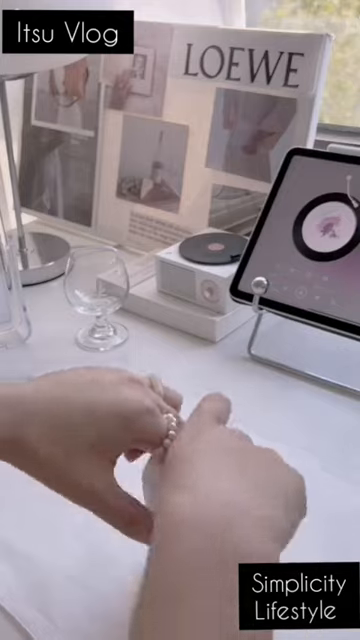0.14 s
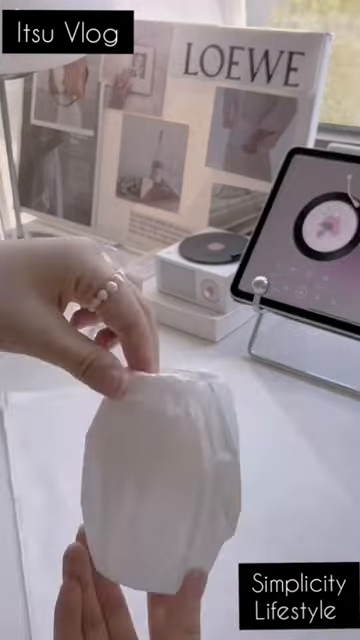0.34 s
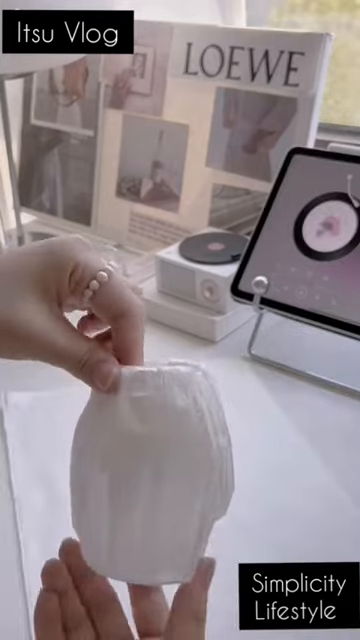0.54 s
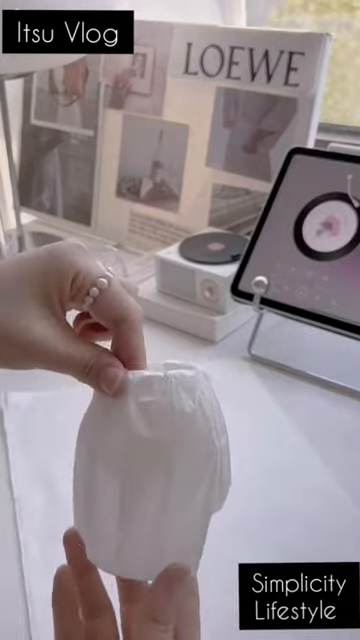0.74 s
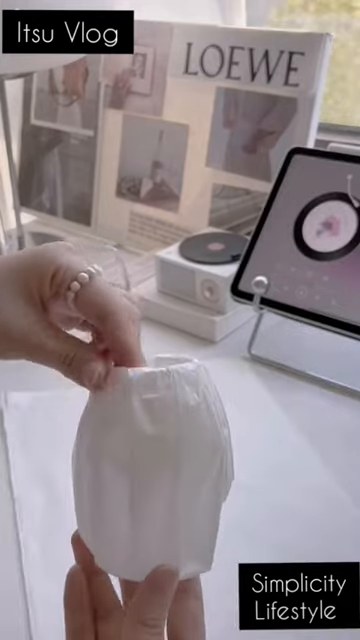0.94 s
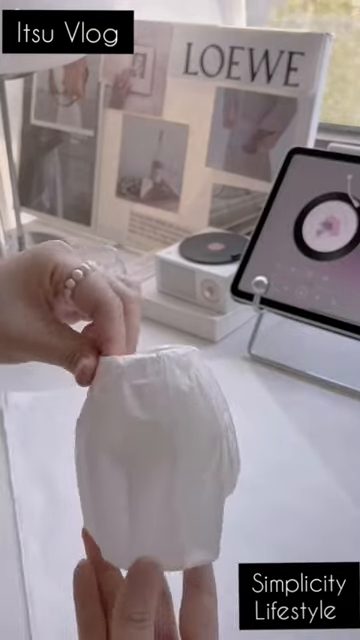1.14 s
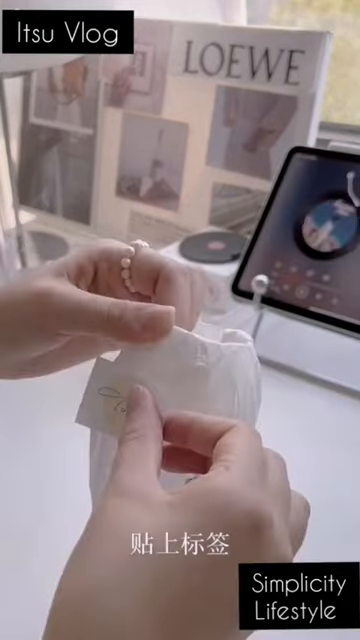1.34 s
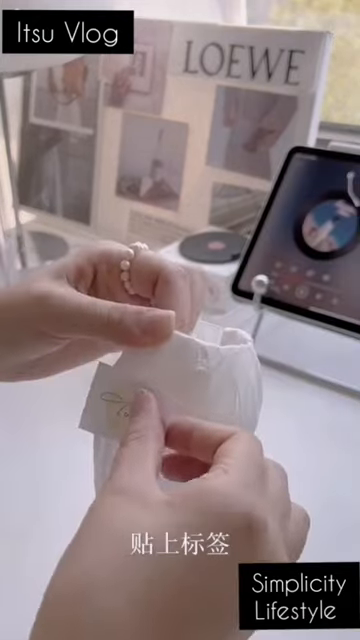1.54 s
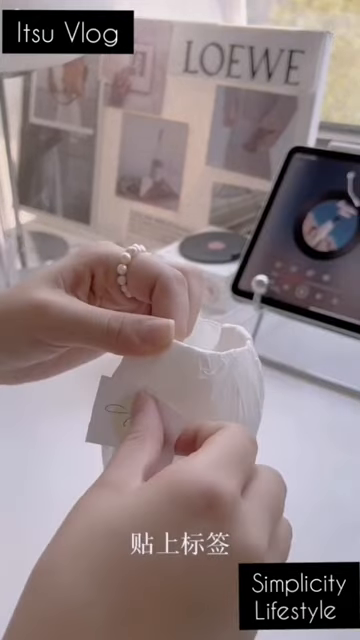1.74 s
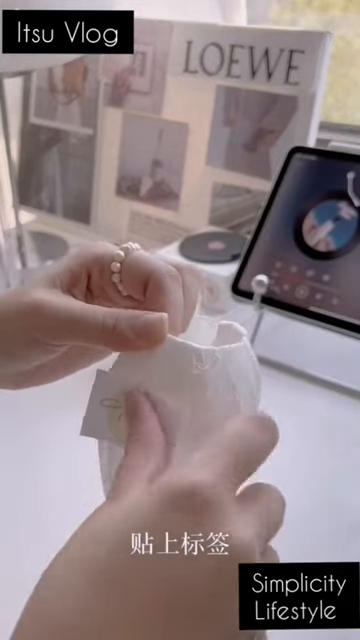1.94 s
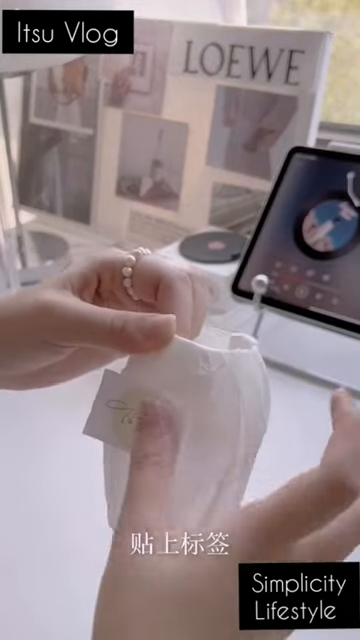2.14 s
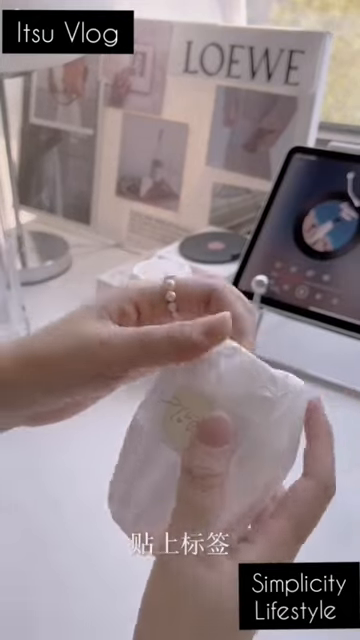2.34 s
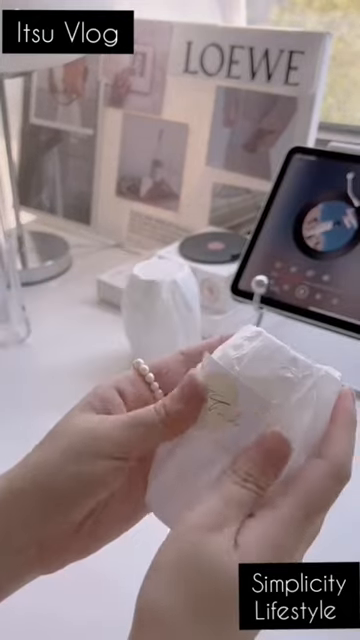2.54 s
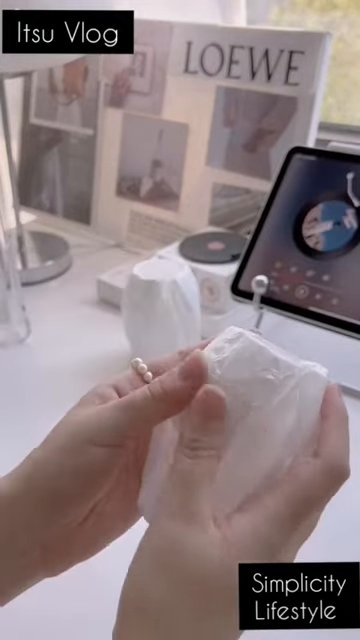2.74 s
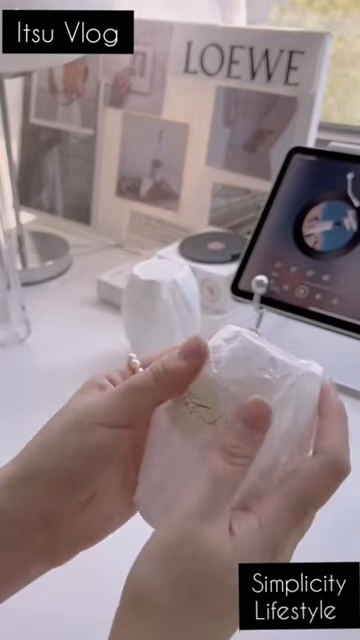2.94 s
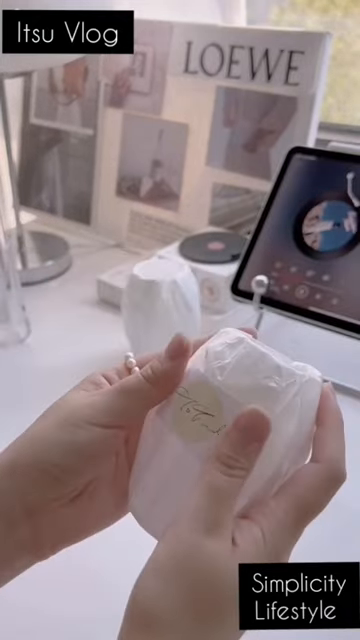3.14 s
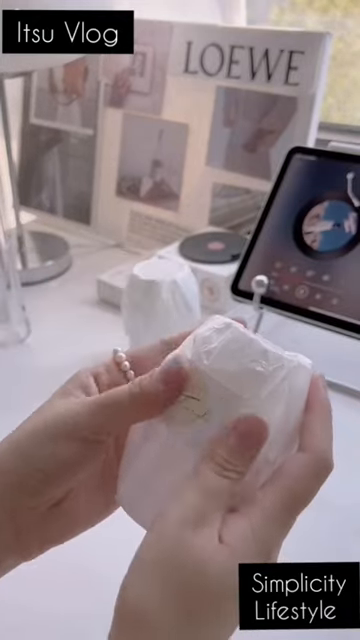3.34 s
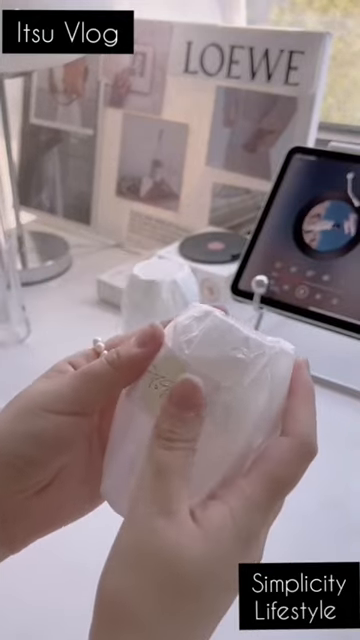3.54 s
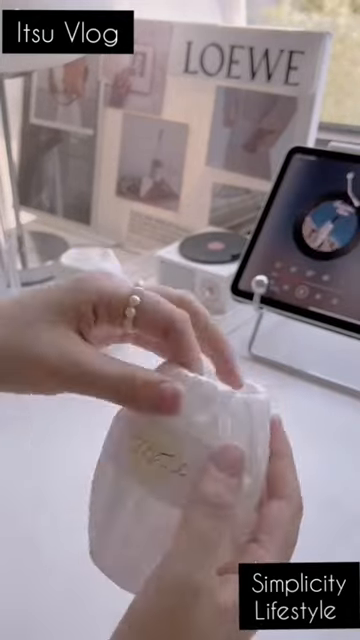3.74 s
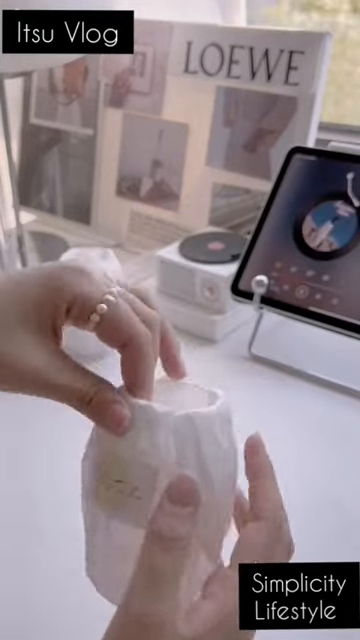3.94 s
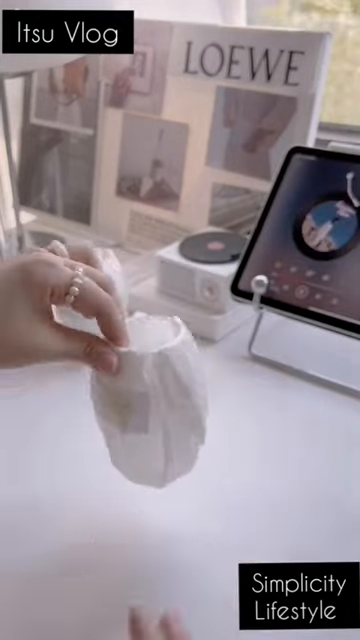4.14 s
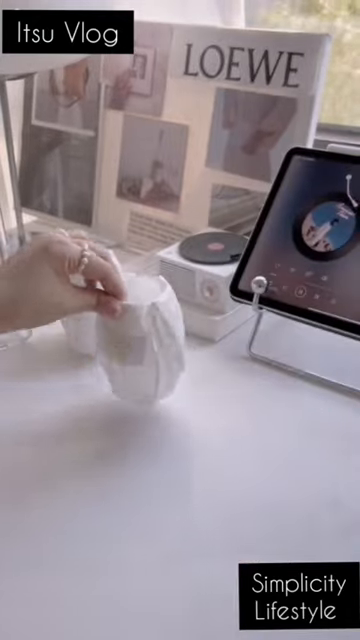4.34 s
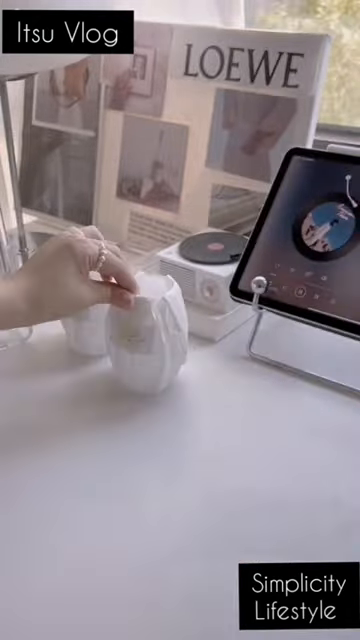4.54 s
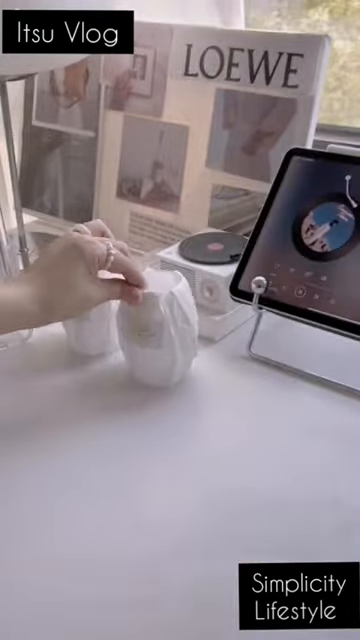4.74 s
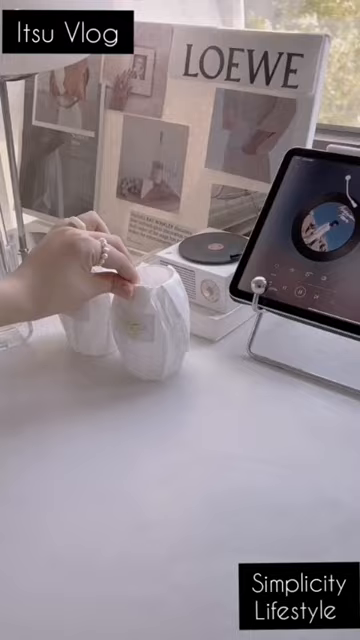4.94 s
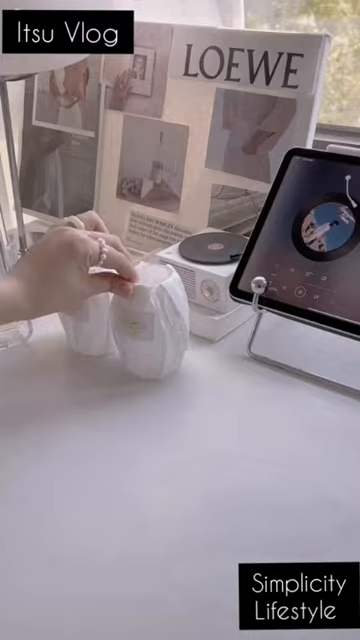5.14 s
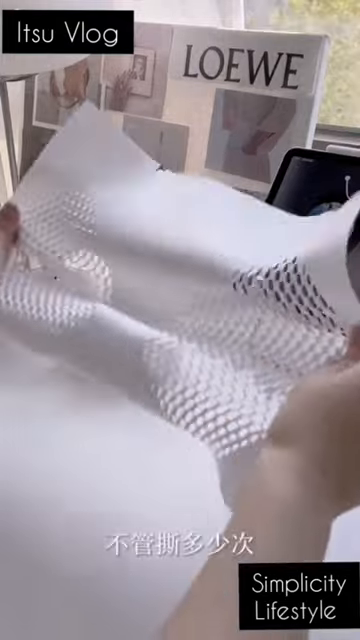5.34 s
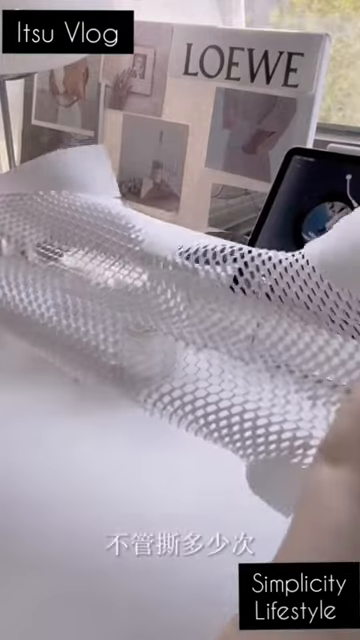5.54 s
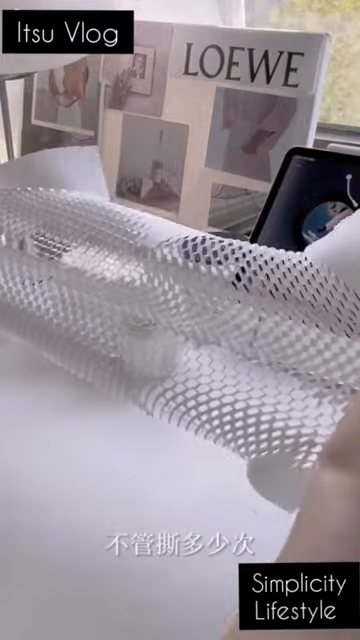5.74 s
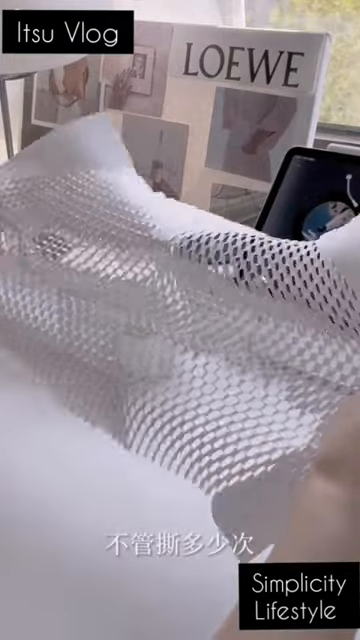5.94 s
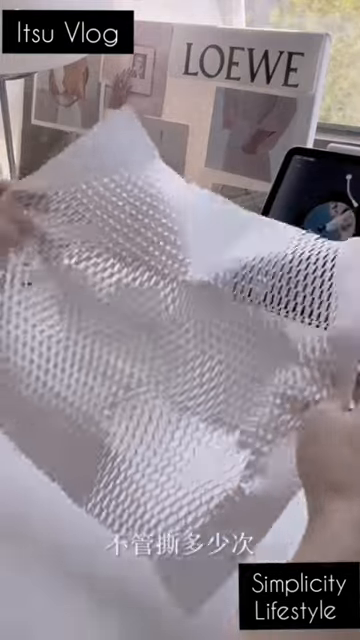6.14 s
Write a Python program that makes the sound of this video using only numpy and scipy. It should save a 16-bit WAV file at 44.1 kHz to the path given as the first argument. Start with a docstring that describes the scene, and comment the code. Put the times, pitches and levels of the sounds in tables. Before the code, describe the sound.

Thin paper crinkles and snaps around a glass, quieter handling follows, a dull knock on the desk, then honeycomb paper rips open in a crackling rush.

```python
"""Thin paper rustles and its folds snap as hands wrap a glass, press on a label and tuck in the ends.
The wrapped glass is set down on a desk with a dull knock, then a sheet of slit honeycomb paper is pulled open.
Paper is many tiny random slips, shaped by tone and loudness curves; knocks are fading tones and a dull boom.
Close stereo sound, in a slightly ringing room with a faint low rumble and a faint hiss."""
import sys
import numpy as np
from scipy import signal
from scipy.fft import rfft, irfft
from scipy.io import wavfile

SR = 44100
rng = np.random.default_rng(int(sys.argv[2]) if len(sys.argv) > 2 else 0)


def waveform_to_disk(signal):
    """Save audio, clipped to [-1, 1], as 16-bit WAV at the path in sys.argv[1]."""
    frames = np.transpose(np.atleast_2d(signal))
    scaled = np.clip(frames, -1, 1) * 32767
    samples = np.round(scaled).astype(np.int16)
    wavfile.write(sys.argv[1], SR, samples)


N = 272538
TIME = np.arange(N) / SR

# ringing tones of the desk top: (pitch [Hz], relative level [dB], time to fade by 60 dB [s])
DESK_MODES = [(121, -23, 1.25), (176.49, -22.5, 0.73), (232.31, -26, 0.67), (288.51, -27, 0.22),
              (366, -11.5, 0.043), (392.55, -21.5, .3), (511.08, -30.5, .3), (724.25, -13, 0.088),
              (778, -15.5, 0.034), (1199.8, -7.5, 0.017)]
# tone of crinkling paper: (frequency [Hz], relative level [dB per Hz])
CRINKLE_TONE = [(300, -29), (800, -7), (1200, -3.5), (1900, 0.5), (2400, 1), (3300, 1), (4900, -0.5),
                (5900, 0), (10500, -6.5), (12500, -2.5), (15500, -9)]
# tone of rubbing fingers and a fluttering sheet: (frequency [Hz], relative level [dB per Hz])
RUB_TONE = [(90, -12), (220, 0.5), (370, -1), (520, -1), (740, -2.5), (1050, -4), (1600, -2.5), (4000, -30)]
# tone of tearing slits and of skin hissing over paper: (frequency [Hz], relative level [dB per Hz])
TEAR_TONE = [(3000, -43), (6000, -14), (7500, -3), (10300, -2.5), (12200, 2), (14000, 4.5), (15500, -4.5)]

FIRM_GRIP_DB = -48   # crinkle level at which a grip counts as firm


def from_db(db):
    """Turns decibels into a plain multiplier."""
    return 10 ** (np.asarray(db) / 20)


def rms_one(x):
    """Scales a signal to an average strength (rms) of 1."""
    return x / np.sqrt(np.mean(x ** 2) + 1e-20)


def gains(rows, before_db=None):
    """Turns each dB column of a curve into a gain at every sample."""
    times, *columns = np.transpose(rows)
    return [from_db(np.interp(TIME, times, column, left=before_db)) for column in columns]


def at_hz(points, hz):
    """Reads a curve at any frequency, with straight lines over log frequency."""
    table = np.array(points)
    return np.interp(np.log(hz + 1e-9), np.log(table[:, 0]), table[:, 1])


def convolve(x, impulse):
    """Lets every sample set off the given response, and keeps the length of the signal."""
    x, impulse = np.atleast_2d(x, impulse)
    return signal.oaconvolve(x, impulse, axes=-1)[:, :x.shape[-1]]


def response(spectrum, size=8192):
    """Makes an impulse response with the given spectrum that starts at once (minimum phase)."""
    level_db = at_hz(spectrum, np.fft.rfftfreq(size, 1 / SR))
    cepstrum = irfft(np.log(from_db(level_db)))
    # folding the second half onto the first leaves nothing ahead of time zero
    cepstrum[1:size // 2] *= 2
    cepstrum[size // 2 + 1:] = 0
    return irfft(np.exp(rfft(cepstrum)))


def colour(x, spectrum):
    """Gives white noise a tone and keeps its power."""
    impulse = response(spectrum)
    return convolve(x, impulse / np.linalg.norm(impulse))


def add(out, s, sound):
    """Mixes a sound into the output from time s, cut off at the end."""
    start = max(0, round(s * SR))
    out[..., start:start + sound.shape[-1]] += sound[..., :max(0, N - start)]


def ring(hz, t60, t):
    """A pure tone that fades by 60 dB in t60 seconds."""
    return np.sin(2 * np.pi * hz * t) * from_db(-60 * t / t60)


def wander(per_s):
    """A random line of spread about 1 that takes per_s new values each second."""
    values = np.clip(rng.standard_normal(4096), -2, 2)
    return np.interp(TIME * per_s, np.arange(4096), values)


def grains(per_s, spread_db, clump_db, clump_hz, hiss):
    """Fibres slip at random, in clumps, over a smooth sliding hiss; white, rms 1; middle and side."""
    born = np.flatnonzero(rng.random(N) < per_s / SR)
    sizes = from_db(spread_db * np.minimum(rng.exponential(1, len(born)), 4))
    slips = np.zeros((2, N))
    slips[:, born] = sizes * np.sign(rng.random((2, len(born))) - .5)
    clumps = from_db(clump_db * wander(clump_hz))
    smooth = hiss * rng.standard_normal((2, N))
    return rms_one(clumps * (rms_one(slips) + smooth))


def strokes(rows, attack_s, sag_db_per_s, slows_per_db=0):
    """Each stroke swells (a light one can swell more slowly), sags and fades; one gain curve per dB column."""
    coarse, power = TIME[::32], 0
    for s, held_s, fade_s, *levels_db in rows:
        t = np.maximum(coarse - s, 0)
        lighter_db = max(FIRM_GRIP_DB - levels_db[0], 0)
        swell = np.minimum(t / (attack_s * np.exp(slows_per_db * lighter_db)), 1)
        sag_db = sag_db_per_s * (t - held_s / 2)   # zero halfway through the hold
        fade_db = 20 * np.maximum(t - held_s, 0) / fade_s
        shape = swell * from_db(-sag_db - fade_db)
        power = power + np.outer(from_db(levels_db), shape) ** 2
    return [np.interp(TIME, coarse, np.sqrt(p + 1e-18)) for p in power]


def room_tail(swell_s, size=SR):
    """Diffuse echoes that build up and die away band by band; middle and side."""
    # how long the room rings: (frequency [Hz], time to fade by 60 dB [s])
    room_t60 = [(120, 0.71), (300, 0.8019), (800, 0.41034), (2500, 0.25), (7000, 0.23), (15000, 0.14)]
    t, tail = TIME[:size], 0
    edges = np.geomspace(60, 19000, 13)
    for low, high in zip(edges, edges[1:]):
        band_filter = signal.butter(2, [low, high], "band", fs=SR, output="sos")
        band = signal.sosfilt(band_filter, rng.standard_normal((2, size)))
        t60 = at_hz(room_t60, np.sqrt(low * high))
        tail = tail + band * from_db(-60 * t / t60)
    return tail * (1 - np.exp(-t / swell_s))


def room(x, wet_db, thin_hz=700):
    """Small paper surfaces throw little bass into the room, so its echoes are thinned below thin_hz."""
    tail = signal.lfilter(*signal.butter(1, thin_hz, "high", fs=SR), room_tail(swell_s=0.0013))
    return from_db(wet_db) * convolve(x[0], tail / np.linalg.norm(tail[0]))


def glances(x, strength, per_s, near_s=.0002, far_s=.003, count=4):
    """Treble glances off the moving hands and paper: short echoes that come and go and shift its colour."""
    treble = signal.lfilter(*signal.butter(1, 1000, "high", fs=SR), x)
    out, power = x.copy(), 1
    for lag_s in np.geomspace(near_s, far_s, count) * rng.uniform(.8, 1.25, count):
        share = strength * wander(per_s)
        out += share * np.roll(treble, int(lag_s * SR), axis=-1)
        power = power + share ** 2
    return out / np.sqrt(power)   # evens out the loudness


def room_rumble():
    """Low noise of the room, with a slowly changing level."""
    # loudness of the rumble: (time [s], level [dB])
    rumble_level = [(0, -66.5), (1.5, -58), (2.3, -54), (3.6, -58.5), (3.9, -67.5), (4.5, -64.5),
                    (5.35, -62), (5.7, -74)]
    # tone of the rumble: (frequency [Hz], relative level [dB per Hz])
    rumble_tone = [(20, -22), (38, -12), (51, 0), (68, -8), (95, -16), (125, -13), (170, -19), (280, -27),
                   (450, -46), (1500, -55), (13000, -60)]
    return gains(rumble_level)[0] * colour(rng.standard_normal((2, N)), rumble_tone)


def desk_drone():
    """The arms lean on the desk and its three lowest modes drone: noise through narrow filters."""
    # the arms lean: (time [s], held for [s], added fade takes 20 dB in [s], level at mid-hold [dB])
    leans = [(0.52, .77, .08, -55), (3.72, 0.4218, 0.1374, -58.5), (4.17, 0.3021, .2, -54)]
    drone_q, step_db = 6, -5   # sharpness of each mode; each higher mode is this much weaker
    white = rng.standard_normal((2, N))
    drone = 0
    for k, (hz, _, _) in enumerate(DESK_MODES[:3]):
        mode = signal.iirpeak(hz, drone_q, fs=SR)
        tone = signal.lfilter(*mode, signal.lfilter(*mode, white))
        drone = drone + from_db(step_db * k) * rms_one(tone)
    return strokes(leans, attack_s=.05, sag_db_per_s=2.5)[0] * rms_one(drone)


def desk_rubs():
    """The glass, hands and sheet rub on the desk: low noise in strokes."""
    # the rubs: (time [s], held for [s], added fade takes 20 dB in [s], level at mid-hold [dB])
    desk_strokes = [(-0.02, .19, 0.0614, -45), (0.18, .068, 0.0087, -30.5), (0.55, .74, 0.0009, -61),
                    (5.28, 0.1649, 0.2329, -52.5)]
    # tone of the rubbing: (frequency [Hz], relative level [dB per Hz])
    desk_tone = [(35, -24), (75, -7), (110, 3.5), (160, -12), (230, -13), (420, -7), (700, -30.5),
                 (3000, -76.5)]
    rubbing = strokes(desk_strokes, attack_s=0.023, sag_db_per_s=3.5)[0]
    return rubbing * colour(rng.standard_normal((2, N)), desk_tone)


def knocks_and_faint_tones():
    """A knock or faint tone: a tick and a fading tone, the modes of the desk top and a dull boom round the room."""
    # soft blows on glass and desk, and three faint tones near 750 Hz, like a finger squeak or the hollow
    # glass ringing: (time [s], relative level [dB], pitch [Hz], time to fade by 60 dB [s],
    # desk against the tone [dB])
    tone_rows = [(0.171, -16.5, 359.6, 0.012555, -25.5), (1.624, -55.5, 731.8, .1, -40.5),
                 (1.881, -51, 754.7, 0.04818, -42.5), (2.053, -28, 277.7, 0.05291, -9),
                 (2.195, -62, 754, 0.18, -38.5), (4.6191, -15, 600, 0.01495, 5.5)]
    # tone of the boom: (frequency [Hz], relative level [dB per Hz])
    boom_tone = [(70, -34.5), (120, -11), (220, -6), (400, -10.5), (550, -5), (800, -7.5), (1300, -12.5),
                 (1550, -22.5), (2300, -27), (3500, -40), (5000, -64)]
    boom_db, tick_db = -18.5, -32   # boom against the desk share; tick against the level of its row
    t = TIME[:2 * SR]
    desk = 0
    for k, (hz, db, t60) in enumerate(DESK_MODES):
        desk = desk + from_db(db) * ring(hz, t60, t) * (-1) ** k   # every other mode starts downwards
    boom = from_db(boom_db) * colour(room_tail(swell_s=.005), boom_tone)
    tick_noise = rng.standard_normal((2, SR)) * np.exp(-t[:SR] / .002)
    tick = from_db(tick_db) * colour(tick_noise, CRINKLE_TONE)
    direct, diffuse = np.zeros((2, 2, N))
    for s, db, hz, t60, desk_db in tone_rows:
        tone = ring(hz, t60, t)
        add(direct[0], s, from_db(db) * (tone + from_db(desk_db) * desk))   # middle only
        add(diffuse, s, from_db(db) * (tick + from_db(desk_db) * boom))
    soften = signal.butter(2, [85, 1800], "band", fs=SR, output="sos")
    return signal.sosfilt(soften, direct) + diffuse


def folds(rows, fall_s, flap_q, uneven_db, push_db, flap_db, crack_db, rise_s=.0009):
    """A fold gives way in a short avalanche of slips that cracks, rings the flap beside it and pushes the sheet."""
    # tone of the pushed sheet: (frequency [Hz], relative level [dB per Hz])
    push_tone = [(80, -20), (250, -11.5), (380, -2), (520, -4), (750, 1.5), (1100, 0), (2000, -26.5),
                 (6000, -82.5)]
    # tone of the crack: (frequency [Hz], relative level [dB per Hz])
    crack_tone = [(1500, -30.5), (3500, -3), (4200, 0.5), (4900, -4), (5900, 0.5), (10500, -2.5),
                  (12500, 0), (15500, -5.5)]
    build_s, loudness_s = .0023, 0.004118   # first slip to snap; time over which a burst's energy counts
    middle_hz, big_flap_slows = 2398, .4   # a lower flap gives way more slowly: power of its period
    t = np.arange(-256, 768) / SR   # the snap is at zero
    push, flap, crack = np.zeros((3, 2, N))
    sheet_band = signal.butter(2, 1300, fs=SR)
    flap_band = signal.butter(1, [900, 5000], "band", fs=SR)
    for s, level_db, low_db, high_db, hz in rows:
        speed = (hz / middle_hz) ** big_flap_slows
        avalanche = np.exp(np.minimum(t / rise_s, -t / fall_s) * speed)
        steps = np.repeat(rng.standard_normal(len(t) // 8), 8)   # a new slip size every 8 samples
        sizes = from_db(uneven_db * np.clip(steps, -2, 2))
        slips = rng.standard_normal((3, 2, len(t))) * avalanche * sizes   # three parts, middle and side
        dull = signal.lfilter(*sheet_band, slips[0])
        rung = signal.lfilter(*signal.iirpeak(hz, flap_q, fs=SR), slips[1])
        rung = signal.lfilter(*flap_band, rung)
        for out, burst, db in ((push, dull, low_db), (flap, rung, 0), (crack, slips[2], high_db)):
            energy = np.sum(burst ** 2, axis=1, keepdims=True)
            even = burst / np.sqrt(energy / (loudness_s * SR))
            add(out, s + build_s + t[0], from_db(level_db + db) * even)
    pushed = from_db(push_db) * convolve(push, response(push_tone))
    return pushed + from_db(flap_db) * flap + from_db(crack_db) * colour(crack, crack_tone)


def creases(level, from_s, until_s, count):
    """Lesser creases snap at loose intervals while paper is worked, louder when it is worked harder."""
    follows, spread_db = .7, 5.5   # dB per dB of working level; chance adds up to this much either way
    low_hz, high_hz = 1277.2, 3800   # range of flap pitches
    when, size, pitch = rng.random((count, 3)).T
    times = from_s + (np.arange(count) + when) / count * (until_s - from_s)
    working_db = 20 * np.log10(np.interp(times, TIME, level))
    levels_db = FIRM_GRIP_DB + follows * (working_db - FIRM_GRIP_DB) + spread_db * (2 * size - 1)
    flaps_hz = low_hz * (high_hz / low_hz) ** pitch
    rows = [(s, db, 0, 0, hz) for s, db, hz in zip(times, levels_db, flaps_hz)]
    return folds(rows, fall_s=.0013, flap_q=7.0, uneven_db=4.0, push_db=-9, flap_db=1, crack_db=-3.5)


def honeycomb():
    """Thousands of slits open: their ends tear, the cells pop up and the whole sheet flutters."""
    # the sheet is pulled open:
    # (time [s], relative flutter level [dB], relative popping level [dB], relative tearing level [dB])
    mesh = [(5.215, -68, -68.5, -71), (5.223, -64, -66.5, -68.5), (5.233, -47.5, -43, -48.5),
            (5.247, -41.5, -35, -40), (5.295, -44.5, -37, -40.5), (5.305, -37.5, -28.5, -35),
            (5.393, -42, -26.5, -27), (5.439, -40, -29.5, -34), (5.453, -44, -34, -31),
            (5.643, -61.5, -42, -38.5), (5.781, -63.5, -41, -38.5), (5.831, -69.5, -58, -57.5),
            (6.111, -64.5, -50.5, -52.5), (6.121, -63, -54, -42), (6.18, -61.5, -57.5, -55.5)]
    # tone of the popping cells: (frequency [Hz], relative level [dB per Hz])
    pop_tone = [(500, -39.5), (1200, -10), (1900, -3), (2700, -1), (3900, 1), (5000, -5.5), (6200, -5.5),
                (9000, -14.5)]
    flutter, pop, tear = gains(mesh, before_db=-120)
    sheet_grains = grains(1500, spread_db=2.0, clump_db=3.0, clump_hz=149.2, hiss=.3)
    cell_grains = grains(1800, spread_db=2.8, clump_db=2.6, clump_hz=300, hiss=.45)
    slit_grains = grains(6000, spread_db=1.5, clump_db=1.5, clump_hz=412.52, hiss=0.52)
    sheet = from_db(3.5) * colour(flutter * sheet_grains, RUB_TONE)
    cells = from_db(0.1832) * colour(pop * cell_grains, pop_tone)
    slits = from_db(0.8438) * colour(tear * slit_grains, TEAR_TONE)
    buckles = creases(pop, from_s=5.24, until_s=6.17, count=28)
    return sheet + cells + slits + buckles


def wrapper():
    """Small wrinkles crinkle, with a sharp tick now and then, while the fingers slide over the paper."""
    # the fingers take hold of the wrapper and squeeze: (time [s], held for [s], added fade takes 20 dB in [s],
    # relative crinkle level at mid-hold [dB], relative finger rub level at mid-hold [dB])
    grips = [(-0.02, 0.08962, 0.1329, -24.5, -30), (0.075, 0.16452, 0.0452, -30, -31),
             (0.25, 0.13723, 0.2579, -40.5, -43.5), (0.398, 0.02705, 0.0894, -33, -44.5),
             (0.462, 0.07647, 0.1272, -31.5, -47), (0.58, 0.11896, 0.1289, -33.5, -44),
             (0.73, 0.19563, 0.1422, -46, -52), (0.805, 0.03227, 0.1063, -33.5, -51),
             (0.928, 0.15017, 0.146, -32.5, -48.5), (1.09, 0.09894, 0.1187, -36.5, -55),
             (1.2, 0.09106, 0.0425, -43, -47), (1.585, 0.2215, 0.3051, -65.5, -67),
             (1.77, 0.2706, 0.0339, -58.5, -67.5), (1.942, 0.10595, 0.086, -44.5, -45),
             (2.11, 0.21, 0.0751, -69.5, -62), (2.268, 0.15753, 0.0656, -48.5, -51),
             (2.466, 0.07452, 0.1561, -44, -46.5), (2.602, 0.0609, 0.1561, -44, -42),
             (2.68, 0.11917, 0.1249, -48.5, -49.5), (2.85, 0.07363, 0.1606, -50, -54),
             (2.93, 0.07389, 0.1193, -43.5, -54), (3.07, 0.2394, 0.0149, -55.5, -64),
             (3.285, 0.11914, 0.1168, -47, -49), (3.48, 0.23, 0.1572, -56.5, -57),
             (3.645, 0.0956, 0.0989, -47, -53.5), (3.78, 0.1128, 0.1326, -58.5, -58),
             (3.885, 0.15393, 0.1543, -54, -53), (4.06, 0.093, 0.2829, -69.5, -63.5),
             (4.32, .2, 0.1987, -67.5, -76), (4.625, 0.13543, 0.0673, -63.5, -73),
             (4.81, 0.21439, 0.1873, -63, -57)]
    # a lighter grip swells more slowly: its attack grows by exp(slows_per_db) for each dB below firm
    crinkle, rub = strokes(grips, attack_s=0.021482, sag_db_per_s=14, slows_per_db=0.1245)
    ticks = .3 * grains(90, spread_db=2.5, clump_db=0, clump_hz=1, hiss=0)
    tiny = grains(2500, spread_db=1.0, clump_db=3.2, clump_hz=200, hiss=0.7)
    wrinkles = from_db(0.5) * colour(crinkle * (ticks + tiny), CRINKLE_TONE)
    sliding = rub * grains(900, spread_db=0.5, clump_db=5.0, clump_hz=121.78, hiss=1.0)
    finger_rub = from_db(-2.5) * colour(sliding, RUB_TONE)
    skin_hiss = from_db(-10) * colour(sliding, TEAR_TONE)
    snaps = creases(crinkle, from_s=0, until_s=4.1, count=130)
    return wrinkles + finger_rub + skin_hiss + snaps


def clear_folds():
    """The clearest folds of the paper snap through, each at its own time and flap pitch."""
    # the folds: (time [s], relative level [dB], push of the sheet against that level [dB],
    # crack against that level [dB], flap pitch [Hz])
    fold_rows = [(0.036, -7, -23.5, -14.5, 1944), (0.066, -2, -24.5, -20.5, 3162),
                 (0.093, -11, -20.5, -15.5, 3254), (0.108, -10.5, -16, -18.5, 1959),
                 (0.147, -9.5, -21, -17, 3944), (0.214, -9.5, -22.5, -7, 2095),
                 (0.414, -11, -28.5, -11.5, 3795), (0.465, -13.5, -44.5, -8, 2168),
                 (0.481, -12.5, -29, -12, 3316), (0.516, -2.5, -30.5, -14.5, 3678),
                 (0.541, -11.5, -24.5, -12, 2703), (0.651, -14, -32, -14, 4384),
                 (0.679, -11, -31.5, -15.5, 2582), (0.839, -19, -36, -19.5, 2840),
                 (0.928, -17, -32, -8, 3491), (0.941, -11, -33, -9, 2882), (1.068, -16, -25.5, -6, 3047),
                 (1.099, -13, -26.5, -13, 3760), (1.144, -20, -22, -2, 3460), (1.2, -6, -35.5, -18.5, 2452),
                 (1.246, -14, -27.5, -15, 3230), (1.591, -37, -30.5, -12, 1780),
                 (1.759, -37, -16.5, -15, 2420), (1.805, -25, -22.5, -14.5, 1410),
                 (1.95, -17, -20.5, -13.5, 1859), (2.045, -19, -21, -14, 1919),
                 (2.281, -22.5, -22.5, -10.5, 3841), (2.348, -23.5, -25, -32.5, 2543),
                 (2.413, -20, -23, -20, 1017), (2.429, -24.5, -18, -18, 1480),
                 (2.472, -9.5, -19, -15, 1662), (2.511, -23.5, -12.5, -16, 3623),
                 (2.618, -11.5, -20.5, -12.5, 1687), (2.635, -16.5, -31, -12.5, 1589),
                 (2.7, -21.5, -31.5, -21.5, 3474), (2.711, -18.5, -30.5, -19.5, 3462),
                 (2.773, -25, -29.5, -10.5, 1873), (2.856, -25, -19.5, -34.5, 1780),
                 (2.94, -23.5, -43.5, -7, 3913), (3.019, -28.5, -29, -21.5, 4223),
                 (3.076, -34, -22, -13, 2430), (3.145, -28.5, -25.5, -6.5, 4507),
                 (3.227, -28, -31.5, -14.5, 1655), (3.261, -27, -21, -16, 1734),
                 (3.302, -24.5, -15, -9, 1101), (3.366, -19.5, -28.5, -13.5, 1390),
                 (3.388, -14.5, -37, -20, 3208), (3.477, -17, -20, -19, 1713),
                 (3.504, -20.5, -21, -21.5, 1139), (3.565, -10, -34, -18.5, 3431),
                 (3.6, -29, -18.5, -18, 1250), (3.651, -20.5, -25, -18.5, 1763),
                 (3.683, -21, -21.5, -16, 1460), (3.733, -25.5, -29, -16.5, 3499),
                 (3.819, -24.5, -27, -17.5, 1639), (3.891, -22, -33, -18.5, 2894),
                 (3.961, -24.5, -38.5, -11, 4480), (4.017, -27, -19.5, -10, 1910),
                 (4.03, -29.5, -15.5, -13.5, 1000), (4.135, -27.5, -19.5, -26.5, 2037),
                 (4.429, -45.5, -16, -14, 4400), (5.233, -23, -20.5, -21, 2628),
                 (5.873, -27.5, -29.5, -15.5, 3960), (6.126, -35.5, -22, -5.5, 1881)]
    return folds(fold_rows, fall_s=0.0018989, flap_q=4.0, uneven_db=3.5,
                 push_db=4.0, flap_db=-16.5, crack_db=-1.0)


def scene():
    """Paper, glass and desk in the room, spread between left and right."""
    # the level of the paper sounds and echoes drops abruptly, then returns: (time [s], level [dB])
    level_drop = [(1.303, 0), (1.335, -20), (1.55, -20), (1.585, 0)]
    # side against middle: (frequency [Hz], level [dB])
    width = [(100, -26), (320, -8.5), (780, -1.5), (1150, -6.5), (1900, -24), (2700, -2), (3800, -8),
             (5000, 1), (6500, -16), (9000, -1.5), (11000, -4), (12800, -8), (15000, -9)]
    low_sounds = room_rumble() + desk_drone() + desk_rubs()
    knocks = knocks_and_faint_tones()
    rustle = honeycomb() + wrapper()
    snaps = clear_folds()
    echoes = room(snaps + from_db(-7.5) * rustle, wet_db=-10.0)
    paper = glances(snaps + rustle + echoes, strength=.3, per_s=22)
    mid, side = gains(level_drop)[0] * paper + knocks + low_sounds
    side = convolve(side, response(width))[0]
    return np.array([mid + side, mid - side])   # left and right


def record(dry):
    """The microphone adds a faint hiss; the top is cut steeply."""
    # tone of the microphone hiss: (frequency [Hz], relative level [dB per Hz])
    mic_tone = [(300, 8.5), (1500, -5), (10500, -7), (12500, 0), (15500, -2)]
    hiss = from_db(-84.5) * colour(rng.standard_normal((2, N)), mic_tone)
    top_cut = signal.ellip(12, .1, 80, 15700, fs=SR, output="sos")   # cutoff in Hz
    return signal.sosfilt(top_cut, dry + hiss)


dry = scene()
out = record(dry)
waveform_to_disk(out)
```